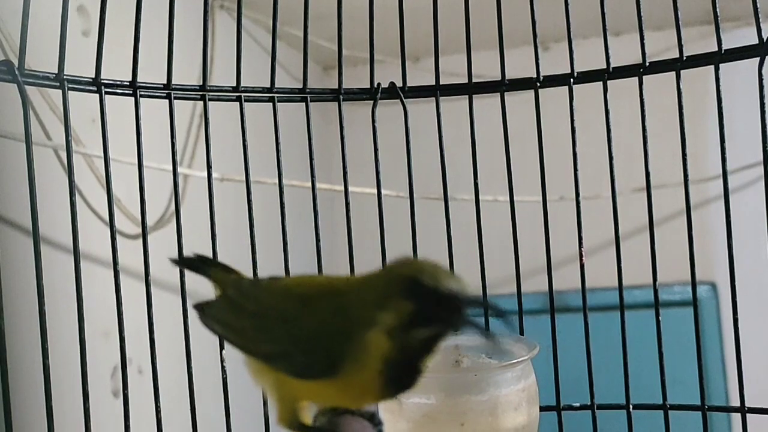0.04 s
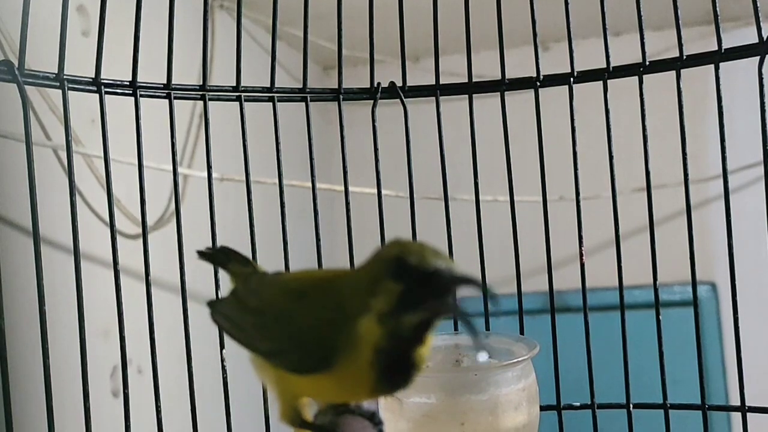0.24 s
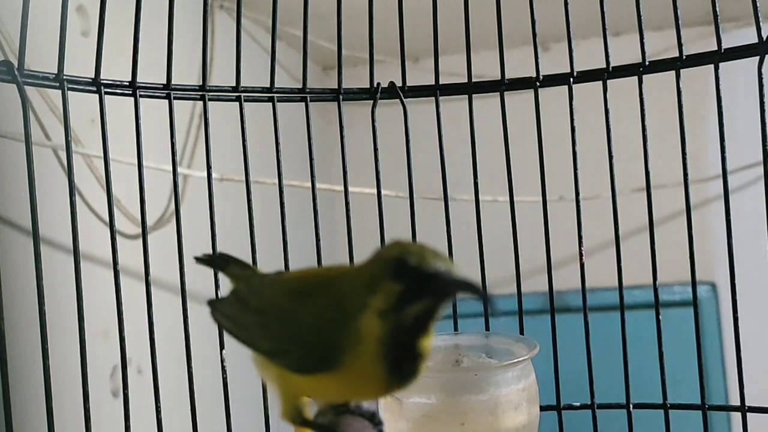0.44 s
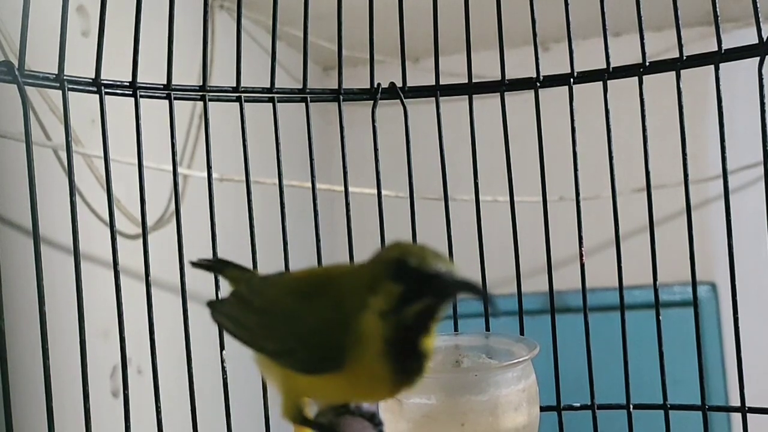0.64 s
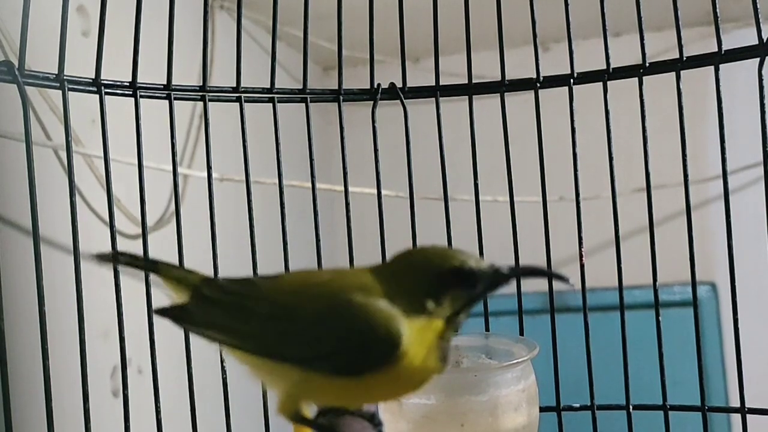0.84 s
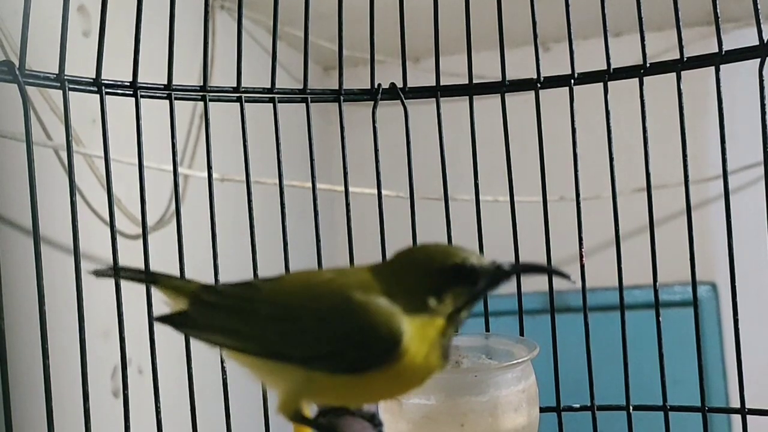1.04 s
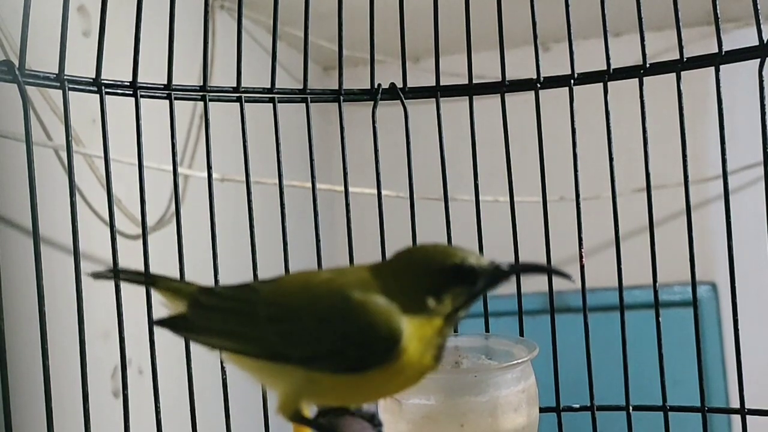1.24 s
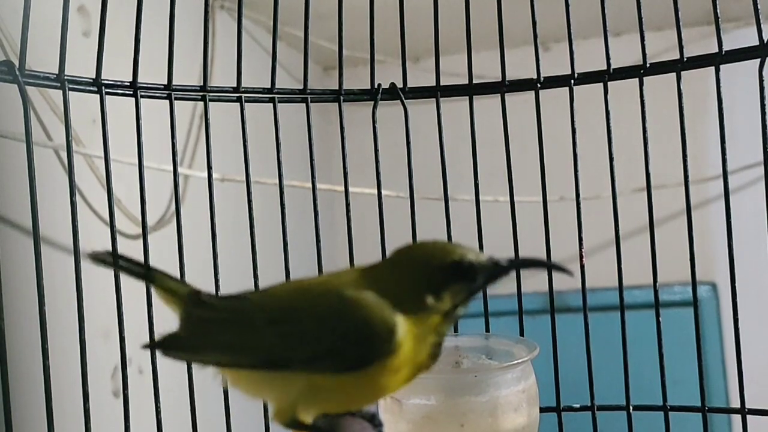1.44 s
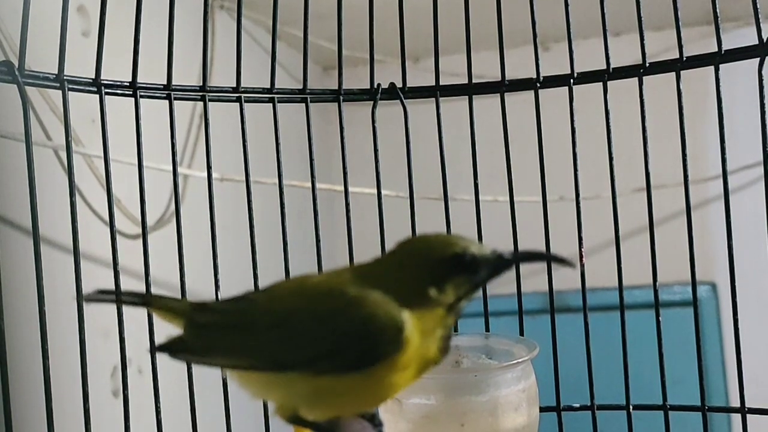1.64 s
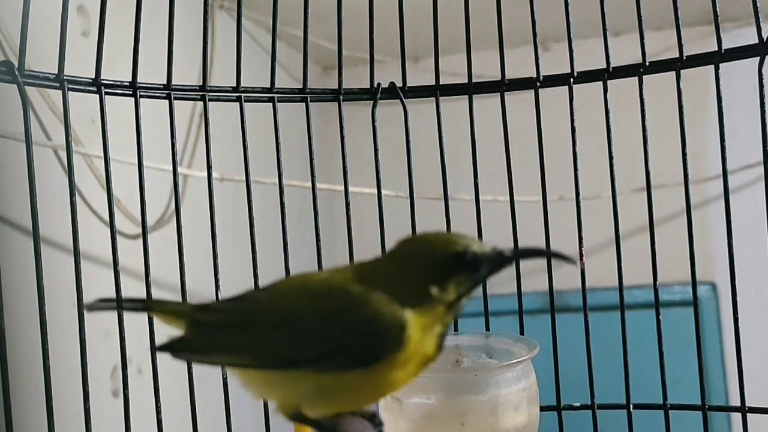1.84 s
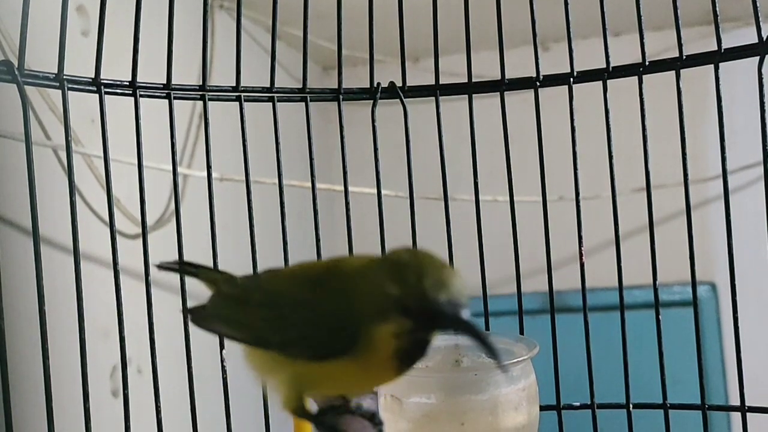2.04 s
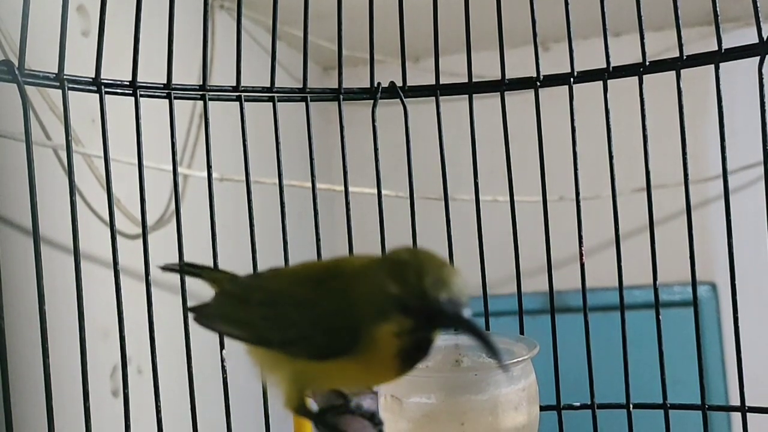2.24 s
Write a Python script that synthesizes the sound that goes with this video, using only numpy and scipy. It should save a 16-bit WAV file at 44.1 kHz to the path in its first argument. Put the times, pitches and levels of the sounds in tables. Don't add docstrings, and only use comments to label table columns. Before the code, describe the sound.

One sharp rasping bird call with tiny beak ticks comes first, then spaced gentle downward chirps; faint distant bird whistles, hard-wall reflections and soft room hiss surround the close stereo pickup.

```python
import sys
import numpy as np
from scipy import signal
from scipy.fft import rfft, irfft, next_fast_len
from scipy.io import wavfile
from scipy.ndimage import uniform_filter1d, minimum_filter1d, map_coordinates

SR = 44100
rng = np.random.default_rng(int(sys.argv[2]) if len(sys.argv) > 2 else 0)


def unload_wav(signal):
    wavfile.write(
        sys.argv[1],
        SR,
        np.round(np.clip(np.atleast_2d(signal).T, -1, 1) * 32767).astype(np.int16),
    )


def volts(x):
    e = np.asarray(x, float) / 20
    return 10 ** e


N = 99225
T = np.arange(N) / SR
TOP_HZ = 15800


def unit(x):
    return x / np.sqrt(np.mean(x ** 2) + 1e-20)


def along(points, hz):
    f, v = np.transpose(points)
    return np.interp(np.log(hz + 1), np.log(f + 1), v)


def wobble(rate, size=N):
    knots = rng.standard_normal(int(size * rate / SR) + 4)
    return unit(map_coordinates(knots, [np.arange(size) * rate / SR]))


def filtered(x, response):
    m = next_fast_len(N + 8192)
    return irfft(rfft(x, m) * response(np.fft.rfftfreq(m, 1 / SR)), m)[..., :N]


def syrinx(hz, rasp, halves, second_db, shake_rad, blur_rad):
    size = len(hz)
    rasp = np.clip(rasp, 0, 1)
    k = np.arange(1, 11)[:, None]

    blur = blur_rad * np.clip(k * hz / 6300 * 5 - 5, 0, 1)
    phase = 2 * np.pi * np.cumsum(hz) / SR
    phase = phase + (shake_rad * rasp + blur) * wobble(600, size)
    phase += 0.8 * rasp * wobble(90, size)

    flutter_hz = 550 * (1 + 0.09 * wobble(150, size))
    flutter = 2 * np.pi * np.cumsum(flutter_hz) / SR
    bend = 1.6 * rasp * np.sin(flutter + k)
    strength = np.where(k == 2, volts(second_db), 1) * (k * hz < TOP_HZ)
    pulses = (strength * np.cos(k * phase + k * k + bend)).sum(0)

    chop = np.exp(0.6 * np.cos(flutter))
    chop = unit(unit(chop - chop.mean()) + 0.4 * wobble(2500, size))
    every_other = 1 + 2 * halves * np.cos(phase[0] / 2)
    return pulses * every_other * (1 - 0.3 * rasp + 0.42 * rasp * chop)


def call():
    # start_s, pitch_hz, level_db, rasp (0-1),
    # every_other_pulse share (0-1), second_overtone_db
    call_path = [
        (0.228, 1650, -30.5, 0.66, 0, 14),
        (0.24, 1656, -13, 0.8, 0.23, -6),
        (0.293, 1684, -16, 0.77, 0.42, -3),
        (.33, 1900, -11.5, .3, 0, 16),
        (.35, 1979, -12, 0, 0.17, 4),
        (0.401, 2070, -14, 0.33, 0.3, -0.5),
        (0.414, 2069, -11, .3, 0.57, -16),
        (0.471, 1870, -15.5, 0.54, 0.1, -6.5),
        (0.494, 1659, -26.5, 0.83, .2, -8),
    ]
    # pitch_hz, level_db
    throat = [(900, -37.5), (2000, -23.5), (3050, -18), (3450, -21.5), (3900, 1), (6400, 0), (7300, -16),
              (8700, -37.5), (15000, -43)]
    # pitch_hz, level_db
    gasp_colour = [(300, -19), (900, -13.5), (2200, -0.5), (3000, 1.5), (4000, -28.5)]
    # start_s, peak_db
    beak_ticks = [(.2245, -32.5), (.2272, -33.5), (0.228, -35.5)]

    s, *columns = np.transpose(call_path)
    hz, db, rasp, halves, second_db = [np.interp(T, s, c) for c in columns]
    hz = uniform_filter1d(hz, size=500)
    voice = syrinx(hz, rasp, halves, second_db, shake_rad=0.2, blur_rad=0.05)
    voice = filtered(voice, lambda f: volts(along(throat, f)))
    voice /= np.sqrt(uniform_filter1d(voice ** 2, size=900).clip(1e-9))

    gasp = unit(filtered(rng.standard_normal(N), lambda f: volts(along(gasp_colour, f))))
    gasp *= volts(-36.5) * np.clip((0.335 - T) / 0.02, 0.12, 1)
    edges = np.clip((T - s[0]) / 0.0011, 0, 1) * np.clip((s[-1] - T) / 0.004 + 1, 0, 1)
    out = edges * (voice * volts(db) + gasp)

    for at, peak_db in beak_ticks:
        t = (T - at).clip(0)
        fade = volts(peak_db - 60 * t / 0.004) * (T > at)
        click = np.sin(2 * np.pi * 1500 * t) + 0.6 * np.gradient(rng.standard_normal(N))
        out += fade * click
    return out


def chirps():
    # start_s (of the voice), length_s, top_hz, end_hz, level_db
    chirp_notes = [
        (1.011, 0.013, 1650, 1478, -38),
        (1.125, .034, 3800, 2241, -35),
        (1.253, .037, 2650, 1631, -34.5),
        (1.432, 0.026, 2250, 1577, -30),
        (1.53, .025, 2350, 1977, -29),
        (1.617, .026, 2450, 1901, -30.5),
        (1.805, .031, 3050, 1510, -29.5),
        (1.884, 0.024, 2000, 1617, -31.5),
        (2.069, 0.028, 2300, 1766, -28.5),
    ]
    # lead_in_s, lead_in_db, hold (share of length before falling),
    # fall (share of length spent falling), rasp (0-1)
    shapes = [(0.02264, -42, 0, 1.9, 0.49), (.012, -46, .1, 1.1, 0.2), (0.0044, -40, 0.13, .55, .12),
              (0.00705, -39.5, 0.015, 1.1, 0.14), (.017, -31.5, 0.057, 0.27, 0.2),
              (0.0098, -38.5, 0, 1, 0.21), (0.00583, -39.5, .15, .8, 0.26), (.014, -30, 0.013, 0.36, 0),
              (0.00492, -33, 0.003, 1, 0.21)]
    # pitch_hz, level_db
    soft_throat = [(1000, -16), (1700, -3), (3600, 2.5), (5200, -3), (6300, -12.5), (8000, -26.5),
                   (11000, -29.5), (15000, -32.5)]
    unsteady = dict(shake_rad=0.5, blur_rad=0.6)

    out = np.zeros(N)
    t = np.arange(-2000, 3000) / SR
    for (s, length, top_hz, end_hz, db), (lead, lead_db, hold, fall, rough) in zip(chirp_notes, shapes):
        u = t / length
        early = np.clip(t / lead, -1, 0)
        drop = np.cos(np.pi / 2 * np.clip((u - hold) / fall, 0, 1)) ** 2
        hz = end_hz + (top_hz - end_hz) * drop
        hz *= 1 + 0.38 * early + 0.015 * wobble(150, len(t))

        swell = np.sin(np.pi / 2 * np.clip(u / 0.53, 0, 1))
        release = np.clip((length - t) / 0.0062 + 0.32, 0, 1) ** 1.7
        rasp = rough + 0.68 * np.clip(1 - u / 0.3, 0, 1)
        sound = volts(db) * swell * release * syrinx(hz, rasp, rough / 2, 2.32, **unsteady)

        hoarse = np.clip((t + lead) / 0.001, 0, 1) * np.clip(1 - t / 0.002, 0, 1)
        hoarse *= volts(6.5 * early)
        sound += volts(lead_db) * hoarse * syrinx(hz, 0.86, 0.18, 4.1, **unsteady)
        out[round(s * SR) - 2000:][:len(t)] += sound
    return filtered(out, lambda f: volts(along(soft_throat, f)))


def whistles():
    # start_s, length_s, first_hz, last_hz, level_db
    clear_notes = [
        (.02, .14, 5200, 5150, -70),
        (.06, .17, 9280, 9220, -70),
        (.86, .135, 5360, 5800, -58),
        (.93, .07, 3750, 4050, -68),
        (1.022, .09, 4380, 4200, -57),
    ]
    # start_s, length_s, first_hz, last_hz, level_db
    chatter = [
        (1.5, .12, 5900, 5800, -56),
        (1.628, .08, 5800, 5650, -49),
        (1.75, .06, 5500, 5600, -62),
        (2.04, .03, 5600, 5700, -62),
    ]

    out = np.zeros(N)
    for notes, blurred in ((clear_notes, False), (chatter, True)):
        for s, length, first_hz, last_hz, db in notes:
            u = np.clip((T - s) / length, 0, 1)
            hz = first_hz + (last_hz - first_hz) * u + 30 * wobble(100)
            waver = wobble(350) if blurred else volts(3 * wobble(150))
            swell = np.sin(np.pi * u ** 0.65) * waver
            out += volts(db) * swell * np.sin(2 * np.pi * np.cumsum(hz) / SR)
    return out


def placed(x, source):
    lead_s = {"call": 1.6e-4, "chirp": 0.00011, "far": -0.00015}
    side_db = {"call": 1, "chirp": 0.17, "far": 2}
    wet_db = {"call": -11, "chirp": -9, "far": -1}
    # delay_s, level_db
    walls = [(.004, -2), (.011, -16), (.018, -17), (.027, -21), (.034, -17.5)]
    # pitch_hz, fade_s
    room_fade = [(500, .45), (3000, 0.36), (6000, 0.34), (12000, 0.27)]

    hz, t, z = signal.stft(rng.standard_normal((2, SR // 2)), SR, nperseg=256)
    fading = z * volts(-60 * t / along(room_fade, hz)[:, None])
    tail = signal.istft(fading, SR, nperseg=256)[1]
    tail *= np.clip(np.arange(tail.shape[1]) / SR / 0.0051, 0, 1)
    tail /= np.linalg.norm(tail[0])
    wet = volts(wet_db[source]) * signal.fftconvolve(x[None], tail, axes=1)[:, :N]

    ports = np.array([[1], [-1]])

    def delay(f, s):
        return np.exp(-2j * np.pi * f * s)

    def paths(f):
        direct = volts(ports * side_db[source]) * delay(f, -ports * lead_s[source] / 2)
        bounces = sum(volts(db) * delay(f, s + ports * rng.normal(0, 0.00022)) for s, db in walls)
        return direct + volts(wet_db[source] + 7.5) * bounces

    return filtered(x, paths) + wet


def air():
    # pitch_hz, level_db (per Hz)
    hiss_colour = [(41, -29.5), (70, -6.5), (124, -11), (357, -7.5), (906, -13), (5140, -25.5), (7680, -41),
                   (9090, -43), (11000, -79.5), (14300, -107), (22000, -120)]
    # pitch_hz, width_hz, level_db
    boom_tones = [(265, 15, -68.5), (341, 38, -64.5)]
    # pitch_hz, likeness (0-1)
    likeness = [(60, .8), (130, .5), (290, .7), (640, .15), (1400, 0)]

    def rush(gain):
        def split(f):
            turn = np.arccos(np.clip(along(likeness, f), -1, 1)) / 2
            return gain(f) * [np.cos(turn), np.sin(turn)]
        mid, side = filtered(rng.standard_normal((2, N)), split)
        return unit(np.array([mid + side, mid - side]))

    def peak(hz, width_hz):
        return lambda f: 1 / (1 + (2 * (f - hz) / width_hz) ** 2)

    booms = sum(volts(db + 1.1 * wobble(4.1)) * rush(peak(hz, width)) for hz, width, db in boom_tones)
    hum_hz = 48.6
    hum = np.sin(2 * np.pi * hum_hz * T + 0.5 * wobble(2.5)) + 0.3 * rush(peak(hum_hz, 7))
    hum *= volts(-59 + 0.8 * wobble(3))
    hiss = volts(-56 + 0.8 * wobble(1.4)) * rush(lambda f: volts(along(hiss_colour, f)))
    return hiss + booms + hum


def scene():
    return placed(call(), "call") + placed(chirps(), "chirp") + placed(whistles(), "far") + air()


def top_cut(x):
    return signal.sosfilt(signal.butter(12, 16130, fs=SR, output="sos"), x)


def record(dry):
    duck_over_db, duck_ratio = -22, 0.49
    hold_s, recover_db_per_s = 0.225, 9
    level_db = 10 * np.log10(np.abs(uniform_filter1d((dry ** 2).mean(0), size=1300)) + 1e-12)
    need_db = np.clip(level_db - duck_over_db, 0, None) * duck_ratio
    hold = round(hold_s * SR)
    held_db = -minimum_filter1d(-need_db, hold, origin=(hold - 1) // 2)
    recovery_db = recover_db_per_s * T
    duck_db = np.maximum.accumulate(held_db + recovery_db) - recovery_db
    ducked = dry * volts(-uniform_filter1d(duck_db, size=900))
    mix = filtered(ducked, lambda f: f < TOP_HZ)
    return top_cut(mix)


dry = scene()
out = record(dry)
unload_wav(out)
```